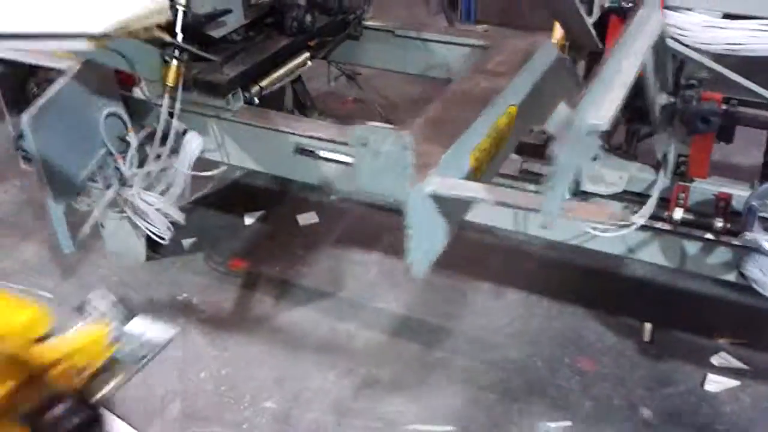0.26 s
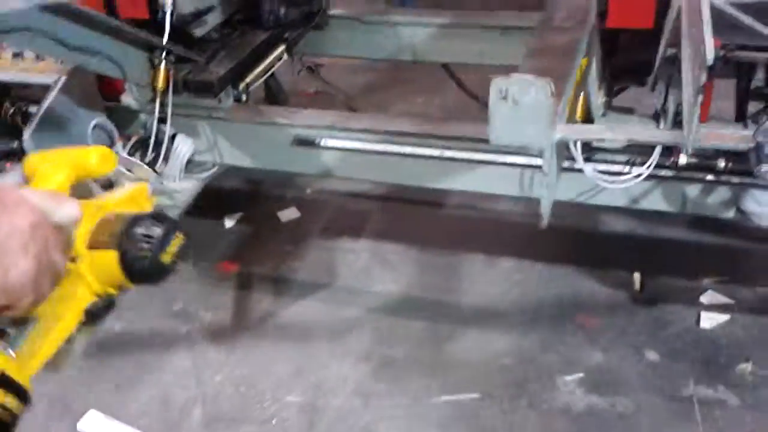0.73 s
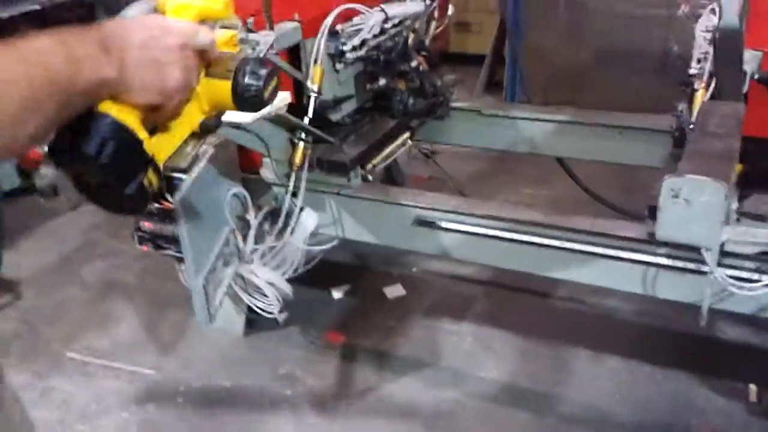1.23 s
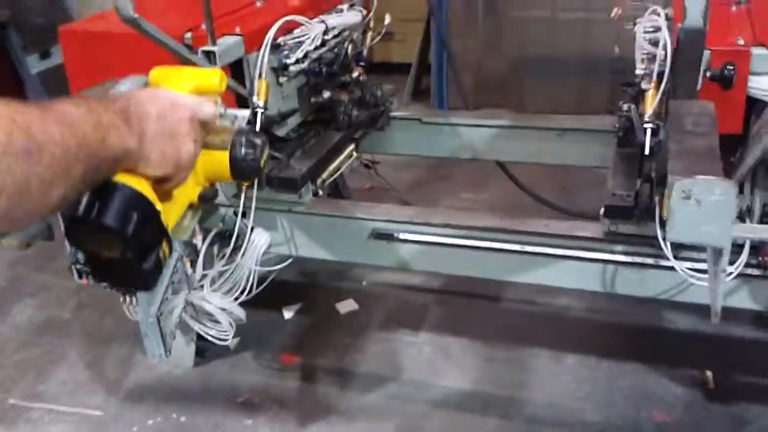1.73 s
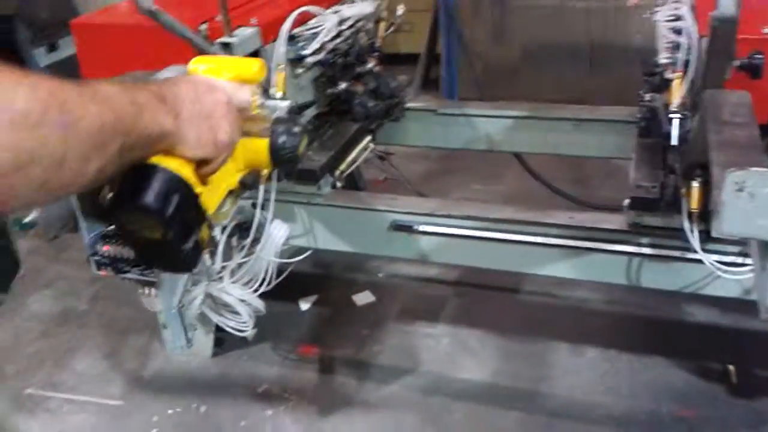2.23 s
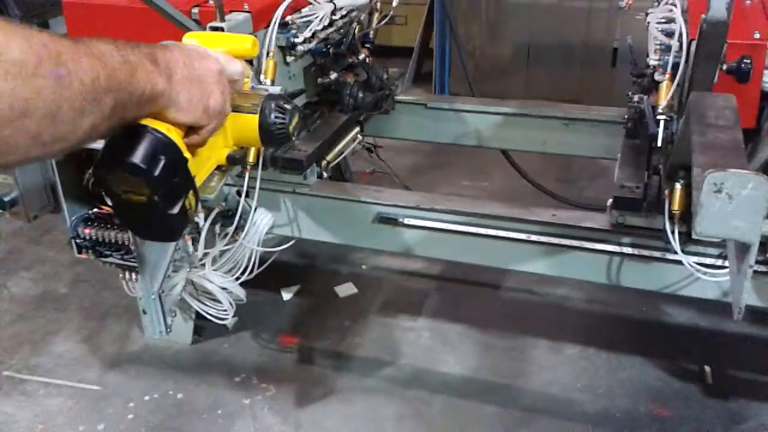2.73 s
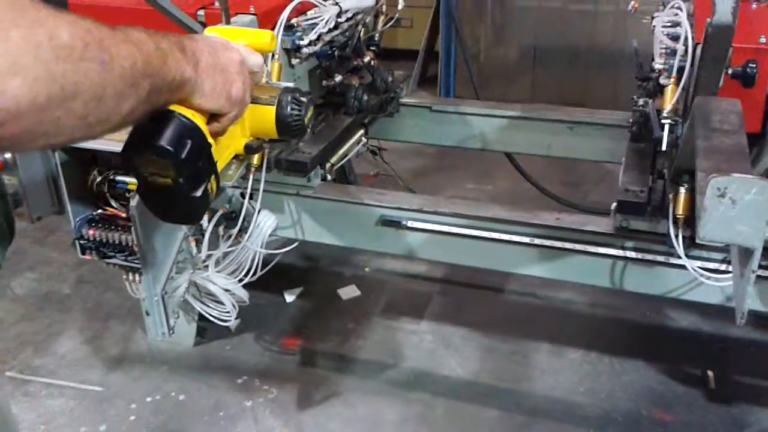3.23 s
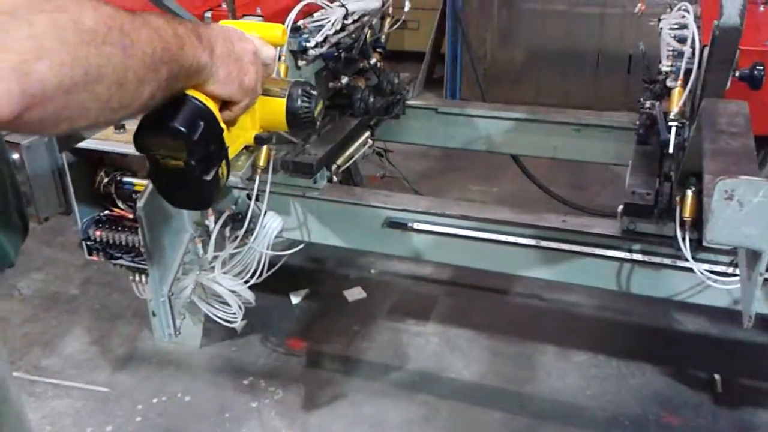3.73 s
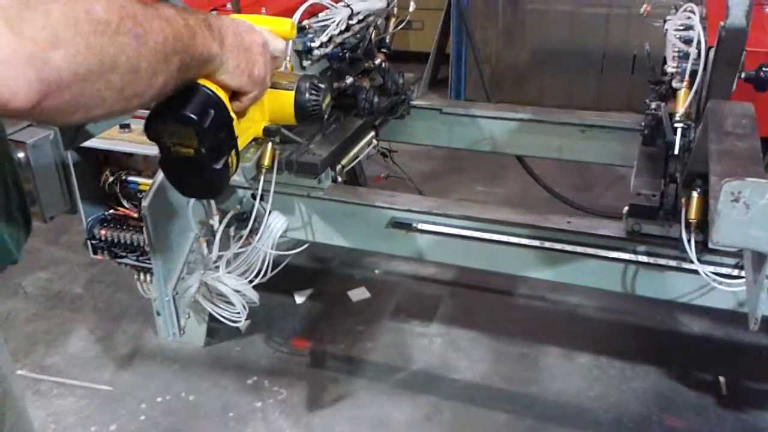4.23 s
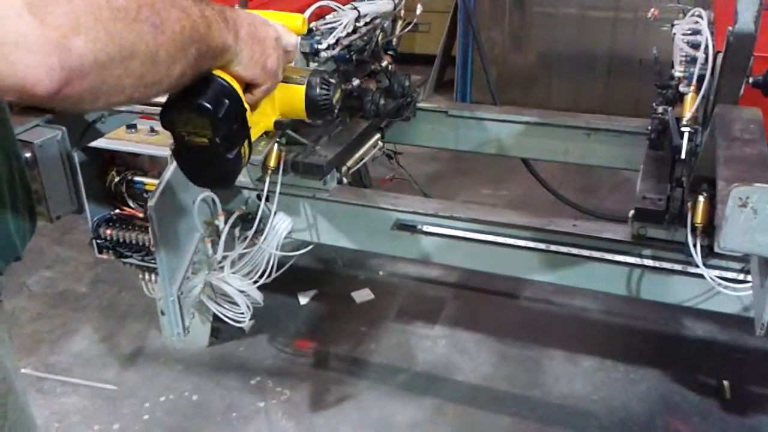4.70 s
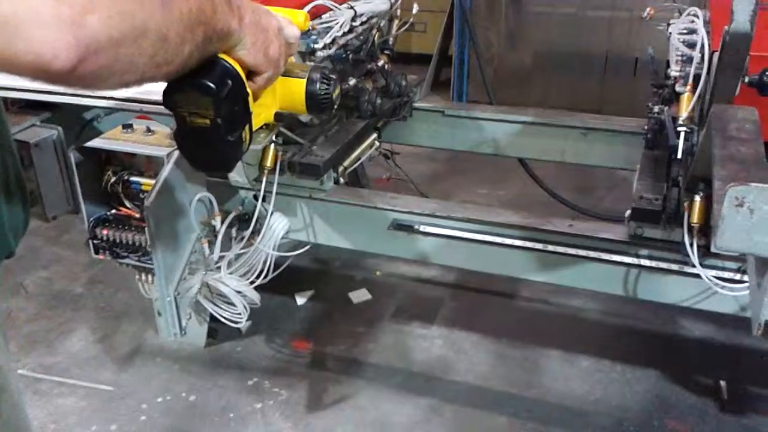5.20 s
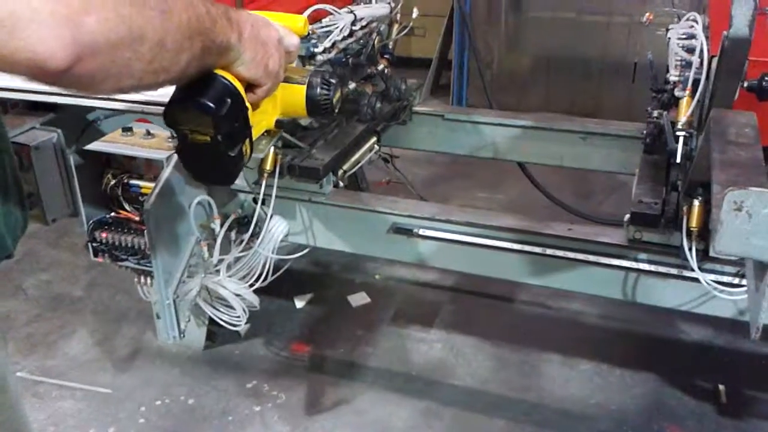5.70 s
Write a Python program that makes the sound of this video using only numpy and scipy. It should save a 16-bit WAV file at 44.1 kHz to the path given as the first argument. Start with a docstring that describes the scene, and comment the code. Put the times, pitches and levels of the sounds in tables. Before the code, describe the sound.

Over a low motor whirr, a valve clicks and leaks, then a harsh, bright air-gun blast roars, briefly eases and returns harder.

```python
"""Mitre saw and air jet

A double-head mitre saw runs in a workshop: harmonics of the shaft speed hum, shaped noise is the blades' whirr.
Compressed air leaks as hiss and low rush, with clicks, a hollow hoot and gliding whistles of fluttering tone.
Then a full jet, one uneven flow of noise, blasts the machine bed and drives resonances of edges and slots.
The jet sweeps on, eases for a moment and comes back harder, its draught buffeting the microphone."""
import sys
import numpy as np
from scipy import signal
from scipy.fft import rfft, irfft, next_fast_len
from scipy.io import wavfile

SR = 44100
rng = np.random.default_rng(int(sys.argv[2]) if len(sys.argv) > 2 else 0)


def store_wav(level_fs):
    """Save 16-bit WAV to argv[1]."""
    pcm = np.round(np.clip(np.atleast_2d(level_fs), -1, 1) * 32767)
    wavfile.write(sys.argv[1], SR, pcm.T.astype(np.int16))


N = 262395
TIME = np.arange(N) / SR  # seconds
HZ = np.maximum(np.arange(N // 2 + 1) * SR / N, 1)  # frequency of each spectrum bin

# Spectra below are relative: overall level is set where each sound is mixed.
MOTOR_HZ = 59.87
# motor hum harmonics: shaft_multiple, level_db
HUM_HARMONICS = [(1, -77), (2, -64), (3, -62), (5, -56.5), (6, -50.5), (7, -52.5), (14, -58), (16, -58)]
# motor loudness over time: time_s, gain_db
HUM_CURVE = [(0, -2.5), (1.4, -1), (2.3, -3), (2.8, 1), (3.5, 0), (4.6, 0), (5.95, 0.5)]
# colour of the blades spinning in air: freq_hz, density_db_per_hz
WHIRR_SPECTRUM = [(40, -17), (90, -20), (200, -16.5), (550, -15.5), (850, -9), (1380, -10.5), (1800, 1),
                  (2500, -3.5), (3400, -9), (7000, -9.5), (9700, -9), (11000, -17), (12300, -21.5),
                  (16000, -21)]
# blade loudness over time: time_s, level_db
WHIRR_CURVE = [(0, -33.5), (.2, -35.5), (.5, -35.5), (.8, -35), (1.4, -34.5), (4.7, -32), (5.95, -39)]

# the half-open valve leaks until the jet takes over: the low rush comes at once, the hiss swells
LEAK_START_S, LEAK_END_S, LEAK_RELEASE_S, LEAK_SAG_DB_PER_S = 0.51, 1.6, 0.07, 4
LEAK_HISS_DB, LEAK_HISS_RISE_S, LEAK_RUSH_DB, LEAK_RUSH_RISE_S = -32, 0.2, -42, 0.03
# bright part of the leak: freq_hz, density_db_per_hz
LEAK_HISS_SPECTRUM = [(1500, -32), (2600, 1.5), (3600, -6.5), (5400, -3.5), (6300, -0.5), (7800, 3.5),
                      (9500, -2), (10500, -6), (12500, -14), (16000, -26)]
# low part of the leak: freq_hz, density_db_per_hz
LEAK_RUSH_SPECTRUM = [(300, -15), (550, -14), (800, -1.5), (1050, 0), (1400, -6), (2200, -7)]
# short clicks, spits of air and one soft thump: start_s, level_db, centre_hz
SNAP_EVENTS = [(.545, -34, 1207), (1.022, -27, 2690), (1.245, -31, 4020), (1.485, -32, 6500),
               (1.828, -14, 3190), (1.989, -32, 111), (4.833, -14, 3027)]
# air hooting across a hollow: start_s, peak_s, end_s, level_db, octave_below_db (against the hoot),
# peak_pitch_hz, glide_before_hz_per_s, glide_after_hz_per_s
HOOT_EVENTS = [(0.561, 0.697, .79, -37, -22, 1014, 2900.5, 900),
               (1.403, 2.28, 2.69, -29.5, -17, 1112, 0, -1250)]
# whistles of air at the valve and on sharp edges: start_s, end_s, start_hz, end_hz, level_db
WHISTLE_GLIDES = [(.735, .875, 7250, 8750, -34), (.86, 1.25, 7400, 8350, -40), (1.1, 1.48, 8200, 8600, -43),
                  (.86, 1.18, 9200, 9800, -40), (.6, .92, 9380, 9500, -43), (.62, .82, 6800, 8300, -43),
                  (.85, 1.35, 6100, 6450, -45), (1.44, 1.95, 2240, 2050, -38),
                  (1.445, 1.57, 2995, 2965, -29), (1.445, 1.56, 3715, 3685, -31),
                  (1.56, 1.7, 2735, 2770, -22)]

# blasts of the jet: valve_opens_s, valve_shuts_s, splash_on_metal_db, roar_in_hollows_db
JET_BLASTS = [(1.43, 4.63, -22.5, -29.5), (4.72, 5.95, -21.5, -30)]
VALVE_RISE_S, VALVE_RELEASE_S = 0.05, 0.066
# strength as the jet is swept about in the first blast: time_s, hiss_db
FIRST_SWEEP_CURVE = [(1.49, -14), (2.0, -11.5), (2.25, -10), (2.81, -18), (2.91, -13), (3.3, -17.5),
                     (3.6, -16), (4.3, -18), (4.57, -16.5), (4.64, -23)]
# strength as the jet is swept about in the second blast: time_s, hiss_db
SECOND_SWEEP_CURVE = [(4.77, -21.5), (5.016, -11.5), (5.272, -13), (5.654, -8.5), (5.95, -11)]
# the jet crosses machine parts, surging or slackening: time_s, hiss_gain_db, splash_and_roar_gain_db
JET_SURGES = [(1.59, 3, -3), (1.72, -2.5, -2.5), (1.84, 2, -1), (2.0, 2.5, -0.5), (2.45, -0.5, 2.5),
              (2.66, 0.5, 1.5), (3.45, 4, 0.5), (3.5, -3, 0.5), (3.57, 2, 1.5), (4.06, 2.5, 0.5),
              (4.39, 1, 3), (4.56, 2.5, 2.5)]
SURGE_S = 0.043
# splash, roar and draught follow the jet: dB per dB of strength above the usual
USUAL_JET_DB, SPLASH_FOLLOWS, ROAR_FOLLOWS, DRAUGHT_FOLLOWS = -14, 0.53, 0.38, 2.4
# colour of the jet's hiss: freq_hz, density_db_per_hz
HISS_SPECTRUM = [(3500, -24), (5000, -12.5), (6000, -3), (7300, -0.5), (8000, -2), (8700, -1.5),
                 (10200, -2.5), (11400, -1.5), (12300, -12), (13200, -6.5), (14200, -13.5), (16000, -8.5)]
# colour of its splash on metal: freq_hz, density_db_per_hz
SPLASH_SPECTRUM = [(1000, -24), (1500, -6), (1800, -4), (2450, -1.5), (3100, 2), (3800, -0.5), (4700, -0.5),
                   (5600, 2), (7500, -17.5)]
# colour of its roar in hollows: freq_hz, density_db_per_hz
ROAR_SPECTRUM = [(140, -57), (300, -8.5), (520, -16), (680, -3.5), (830, 2.5), (1080, 6), (1260, 2),
                 (1380, 1), (1600, 3), (2400, -14)]
# resonances of the machine's hollows: freq_hz, width_hz, level_db
HOLLOW_RESONANCES = [(784, 60, -3.5), (966, 42, -0.5), (1090, 76, 0.5), (1220, 59, 1.5), (1482, 42, -4.5),
                     (1647, 57, -1.5)]
# tones of the jet on an edge: freq_hz, width_hz, level_db
EDGE_RESONANCES = [(1320, 14, -9), (1485, 20, -11), (2732, 14, 0), (2911, 16, 0), (3680, 40, -11),
                   (4330, 35, -11), (6080, 50, -4), (6549, 26, 4), (7320, 60, -4), (8400, 60, -5),
                   (8770, 46, -3), (9025, 35, -1), (9743, 50, 2.5)]
# tones of the jet in a narrow slot: freq_hz, width_hz, level_db
SLOT_RESONANCES = [(2760, 60, -12), (3085, 80, 0), (4780, 20, -8), (5966, 45, 3), (6100, 35, -3),
                   (6510, 90, -1), (7185, 30, -2), (7340, 70, -3), (8342, 30, -1), (8832, 45, -1),
                   (9580, 45, -1), (9655, 35, -1)]
# broad resonances of the nozzle: freq_hz, width_hz, level_db
NOZZLE_RESONANCES = [(3270, 350, -4.5), (3820, 450, -3), (5120, 160, -4), (6120, 84, 5), (7526, 150, 4.5),
                     (7970, 60, -5), (8600, 220, 5.5), (8860, 73, -9), (9420, 130, 3), (10520, 48, 3),
                     (11000, 86, -21)]
# the jet rests on an edge and makes it ring: start_s, end_s, level_db (against the hiss)
EDGE_RESTS = [(1.43, 1.56, -1), (1.56, 1.75, 1.5), (5.0, 5.7, -17)]
# the jet rests in a slot and makes it ring: start_s, end_s, level_db (against the hiss)
SLOT_RESTS = [(1.79, 1.88, 1.5), (1.88, 3.45, -6.5), (3.45, 5.65, -13)]
RING_RISE_S, RING_RELEASE_S = 0.043, 0.05
# nozzle ringing grows to this share against the hiss, then holds
NOZZLE_DB, NOZZLE_GROWTH_S = -4, 2.6
# colour of the draught on the microphone: freq_hz, density_db_per_hz
DRAUGHT_SPECTRUM = [(25, -1), (60, -2), (150, 0), (300, -7), (600, 0), (1200, -34)]
# the jet points near the microphone: start_s, end_s, level_db (at the usual jet strength)
DRAUGHT_PASSES = [(1.5, 2.3, -54.5), (4.98, 5.95, -52.5)]
DRAUGHT_RISE_S, DRAUGHT_RELEASE_S = 0.04, 0.04

# echoes from floor, machine bed and walls: delay_s, level_db
ROOM_ECHOES = [(.0047, -16.5), (.0083, -18), (0.0138, -16), (0.0177, -17), (.0263, -19.5), (0.038, -13.5)]
CUTOFF_HZ = 15800


def from_db(db):
    """Decibels to gain."""
    return 10 ** (np.asarray(db) / 20)


def rms_one(x):
    """Scale to unit rms."""
    return x / np.sqrt(np.mean(x ** 2) + 1e-20)


def gain_curve(rows):
    """Draw a time and dB curve as a gain per sample."""
    times, levels_db = np.transpose(rows)
    return from_db(np.interp(TIME, times, levels_db))


def envelope(start, end, rise_s, release_s):
    """Rise from the start, hold until the end, then die away."""
    rise = np.clip((TIME - start) / rise_s, 0, 1)
    return rise * np.exp(-np.maximum(TIME - end, 0) / release_s)


def white():
    """White noise."""
    return rng.standard_normal(N)


def drift(rate_hz):
    """Random wandering with spread 1: smoothed noise at every eighth sample."""
    size = next_fast_len(N // 8 + 2)
    hz = np.arange(size // 2 + 1) * SR / (8 * size)
    spectrum = rfft(rng.standard_normal(size)) / (1 + (hz / rate_hz) ** 2)
    slow = rms_one(irfft(spectrum, size))
    return np.interp(np.arange(N) / 8, np.arange(size), slow)


def coloured(x, spectrum):
    """Give x a broad spectrum that falls away beyond its ends; rms 1."""
    hz, db = np.transpose(spectrum)
    skirts = np.minimum(1, np.minimum(HZ / hz[0], hz[-1] / HZ)) ** 2
    colour = from_db(np.interp(np.log(HZ), np.log(hz), db))
    return rms_one(irfft(rfft(x) * skirts * colour, N))


def resonate(x, modes):
    """Drive parallel resonances of alternating sign with x; rms 1."""
    response = 0
    for k, (hz, width, db) in enumerate(modes):
        detuning = (HZ ** 2 - hz ** 2) / (HZ * width)
        response = response + (-1) ** k * from_db(db) / (1 + 1j * detuning)
    return rms_one(irfft(rfft(x) * response, N))


def rough_tone(hz, width_hz):
    """A tone on a moving pitch whose strength and phase flutter; rms about 1."""
    phase = 2 * np.pi * np.cumsum(hz) / SR
    return drift(width_hz) * np.cos(phase) + drift(width_hz) * np.sin(phase)


def motors(wander=0.001, waver_db=0.75):
    """Harmonics of a slightly wandering shaft speed, each wavering a little in level."""
    turns = np.cumsum(MOTOR_HZ * (1 + wander * drift(2.6))) / SR
    hum = np.zeros(N)
    for multiple, db in HUM_HARMONICS:
        strength = from_db(db + waver_db * drift(8.1))
        hum += strength * np.sin(2 * np.pi * (multiple * turns + rng.random()))
    return np.sqrt(2) * hum * gain_curve(HUM_CURVE)


def idle_blades():
    """Teeth stir the air; their eddies favour one pitch."""
    whirr = from_db(1.0) * coloured(white(), WHIRR_SPECTRUM)
    eddies = from_db(-9.5) * resonate(white(), [(1780, 250, 0)])
    return gain_curve(WHIRR_CURVE) * (whirr + eddies)


def leak():
    """The first escaping air: a bright hiss over a low rush, slowly losing strength."""
    sag_db = LEAK_SAG_DB_PER_S * np.maximum(TIME - LEAK_START_S, 0)
    hiss_shape = envelope(LEAK_START_S, LEAK_END_S, LEAK_HISS_RISE_S, LEAK_RELEASE_S)
    rush_shape = envelope(LEAK_START_S, LEAK_END_S, LEAK_RUSH_RISE_S, LEAK_RELEASE_S)
    hiss = from_db(LEAK_HISS_DB - sag_db) * hiss_shape * coloured(white(), LEAK_HISS_SPECTRUM)
    rush = from_db(LEAK_RUSH_DB - sag_db) * rush_shape * coloured(white(), LEAK_RUSH_SPECTRUM)
    return hiss + rush


def snaps(decay_s=0.015, relative_width=0.68):
    """Short bursts of broadly resonant noise that start abruptly and die at once."""
    out = np.zeros(N)
    for start, db, hz in SNAP_EVENTS:
        fade = (TIME >= start) * np.exp(-np.abs(TIME - start) / decay_s)
        out += from_db(db) * fade * resonate(white(), [(hz, hz * relative_width, 0)])
    return out


def hoot(width_hz=30, octave_width_hz=16):
    """A hollow blown in its second mode, the first faint an octave below; each swells, glides and fades."""
    out = np.zeros(N)
    for start, peak, end, db, octave_db, hz, glide_in, glide_out in HOOT_EVENTS:
        swell = np.interp(TIME, [start, peak, end], [0, 1, 0])
        since_peak = np.clip(TIME, start, end) - peak
        pitch = hz + since_peak * np.where(since_peak < 0, glide_in, glide_out)
        octave_below = from_db(octave_db) * rough_tone(pitch / 2, octave_width_hz)
        out += from_db(db) * swell * (rough_tone(pitch, width_hz) + octave_below)
    return out


def whistles(width_hz=80):
    """Airy tones that swell, glide and fade."""
    out = np.zeros(N)
    for start, end, from_hz, to_hz, db in WHISTLE_GLIDES:
        progress = np.clip((TIME - start) / (end - start), 0, 1)
        swell = np.sqrt(np.abs(np.sin(np.pi * progress)))
        pitch = from_hz + (to_hz - from_hz) * progress
        out += from_db(db) * swell * rough_tone(pitch, width_hz)
    return out


def jet_levels():
    """The valve gates the jet; its strength sets the gains of hiss, splash, roar and draught."""
    sweep = np.transpose([*FIRST_SWEEP_CURVE, *SECOND_SWEEP_CURVE])
    strength_db = np.interp(TIME, *sweep)
    impact_db = np.zeros(N)
    for time, hiss_db, hit_db in JET_SURGES:
        crossing = np.exp(-((TIME - time) / SURGE_S) ** 2)
        strength_db += hiss_db * crossing
        impact_db += hit_db * crossing
    above_db = strength_db - USUAL_JET_DB

    hiss, splash, roar, draught = np.zeros((4, N))
    for opens, shuts, splash_db, roar_db in JET_BLASTS:
        # squaring rounds the onset and halves the doubled release
        valve = envelope(opens, shuts, VALVE_RISE_S, 2 * VALVE_RELEASE_S) ** 2
        hiss += valve * from_db(strength_db)
        splash += valve * from_db(splash_db + impact_db + SPLASH_FOLLOWS * above_db)
        roar += valve * from_db(roar_db + impact_db + ROAR_FOLLOWS * above_db)
    for start, end, db in DRAUGHT_PASSES:
        presence = envelope(start, end, DRAUGHT_RISE_S, DRAUGHT_RELEASE_S)
        draught += presence * from_db(db + DRAUGHT_FOLLOWS * above_db)
    return hiss, splash, roar, draught


def ringing_share(rests):
    """Ringing builds while the jet rests on a part and fades when it moves on."""
    shares = [from_db(db) * envelope(start, end, RING_RISE_S, RING_RELEASE_S) for start, end, db in rests]
    return np.max(shares, axis=0)


def turbulence(flutter_db=0.93, eddy_db=0.63):
    """The flow flutters slowly and jumps from eddy to eddy."""
    return rms_one(from_db(flutter_db * drift(23) + eddy_db * drift(480)))


def jet():
    """One uneven flow drives the hiss, the ringing, the splash, the roar and the draught."""
    hiss_gain, splash_gain, roar_gain, draught_gain = jet_levels()
    edge, slot = ringing_share(EDGE_RESTS), ringing_share(SLOT_RESTS)
    nozzle = from_db(NOZZLE_DB) * np.clip((TIME - JET_BLASTS[0][0]) / NOZZLE_GROWTH_S, 0, 1)
    ringing = edge * resonate(white(), EDGE_RESONANCES)
    ringing += slot * resonate(white(), SLOT_RESONANCES)
    ringing += nozzle * resonate(white(), NOZZLE_RESONANCES)
    # the energy of the stream is shared between plain hiss and ringing
    share = np.sqrt(1 + edge ** 2 + slot ** 2 + nozzle ** 2)
    stream = from_db(0.62) * hiss_gain * (coloured(white(), HISS_SPECTRUM) + ringing) / share
    splash = splash_gain * coloured(white(), SPLASH_SPECTRUM)
    broad_roar = from_db(-2.5) * coloured(white(), ROAR_SPECTRUM)
    hollow_tones = from_db(-6.0) * resonate(white(), HOLLOW_RESONANCES)
    roar = roar_gain * (broad_roar + hollow_tones)
    draught = draught_gain * coloured(white(), DRAUGHT_SPECTRUM)
    return turbulence() * (stream + splash + roar + draught)


def swept(x, delay_s=0.0037, travel=0.0878, bounce_db=-8.5):
    """The nozzle moves over the bed, so its reflection slides and the hiss phases."""
    delay = delay_s * (1 + travel * drift(0.798))
    bounce = from_db(bounce_db)
    reflection = bounce * np.interp(TIME - delay, TIME, x, left=0)
    return (x + reflection) / np.sqrt(1 + bounce ** 2)


def workshop(x, sway_s=0.00006):
    """Hard surfaces echo; the paths change slightly as the hand-held microphone sways."""
    out, energy = x.copy(), 1
    for delay, db in ROOM_ECHOES:
        arrival = TIME - delay - sway_s * drift(0.86)
        out += from_db(db) * np.interp(arrival, TIME, x, left=0)
        energy += from_db(db) ** 2
    return out / np.sqrt(energy)


def scene():
    """Tones stay dry, the noisy sources echo; one microphone feeds both channels alike."""
    tones = motors() + hoot() + whistles()
    noises = idle_blades() + leak() + snaps() + swept(jet())
    mono = tones + workshop(noises)
    return np.stack([mono, mono])


def record(dry):
    """The highest peaks are rounded and the top is cut steeply."""
    rounded = dry / (1 + (dry / 0.85) ** 6) ** (1 / 6)
    lowpass = signal.ellip(10, 0.05, 55, CUTOFF_HZ, fs=SR, output="sos")
    return signal.sosfiltfilt(lowpass, rounded)


dry = scene()
out = record(dry)
store_wav(out)
```